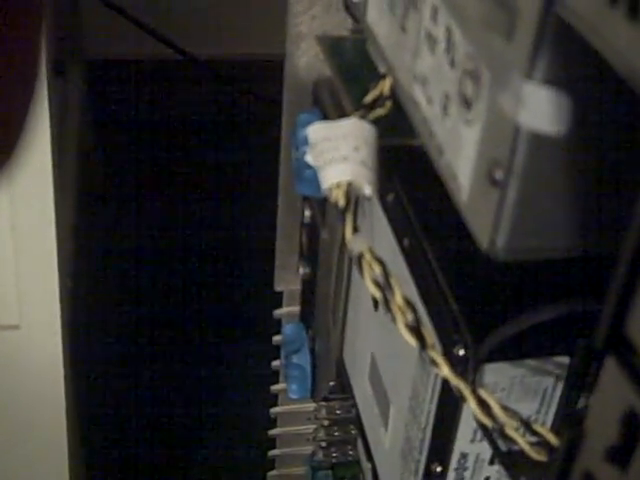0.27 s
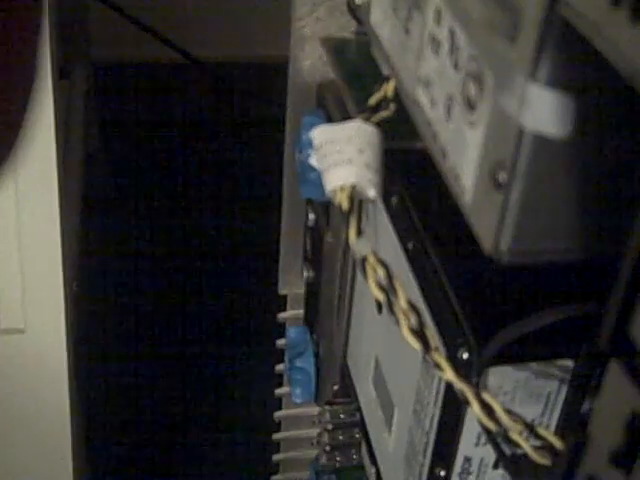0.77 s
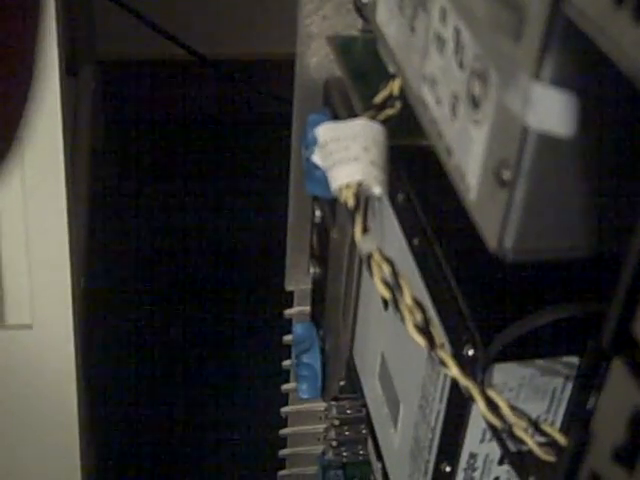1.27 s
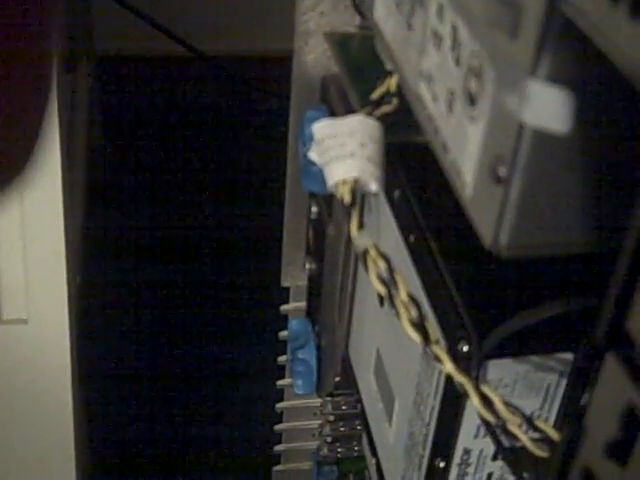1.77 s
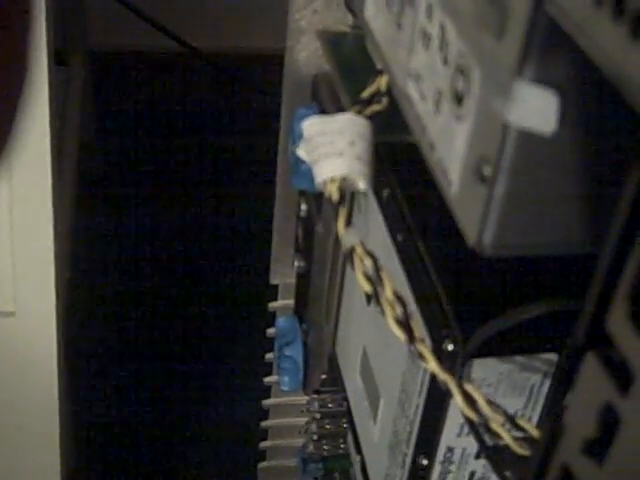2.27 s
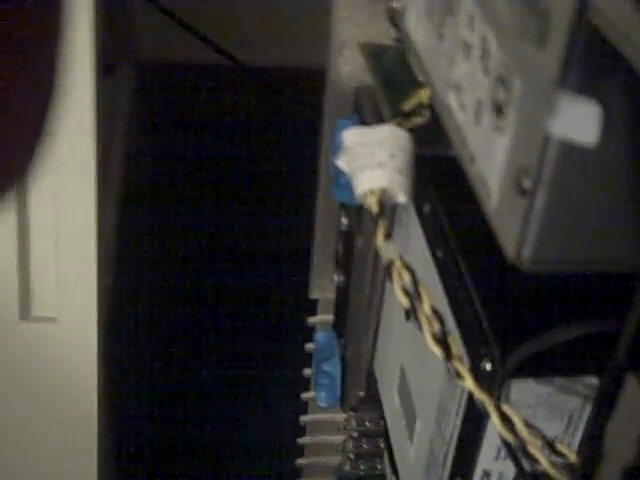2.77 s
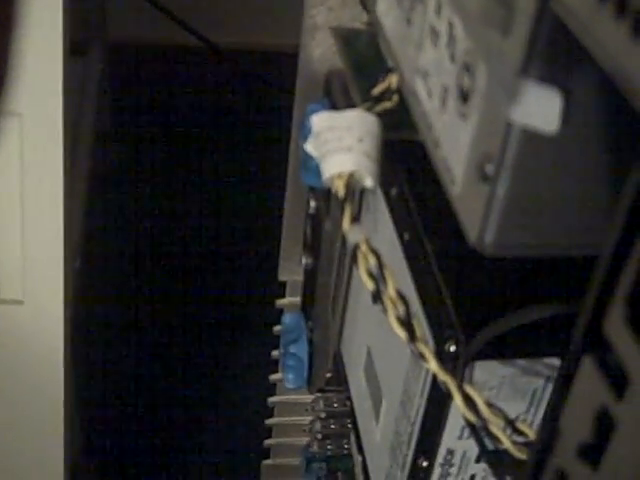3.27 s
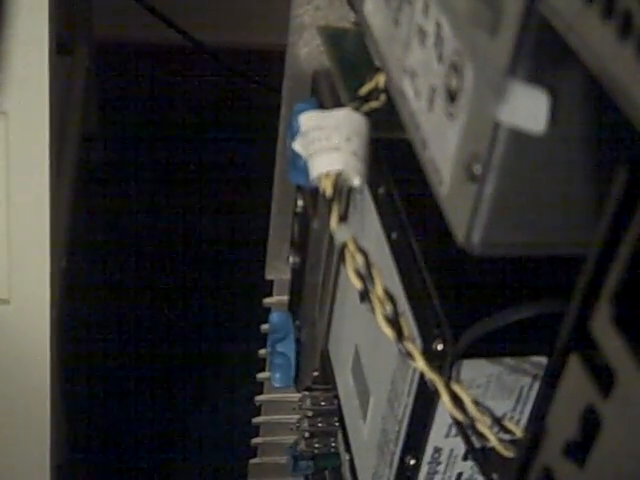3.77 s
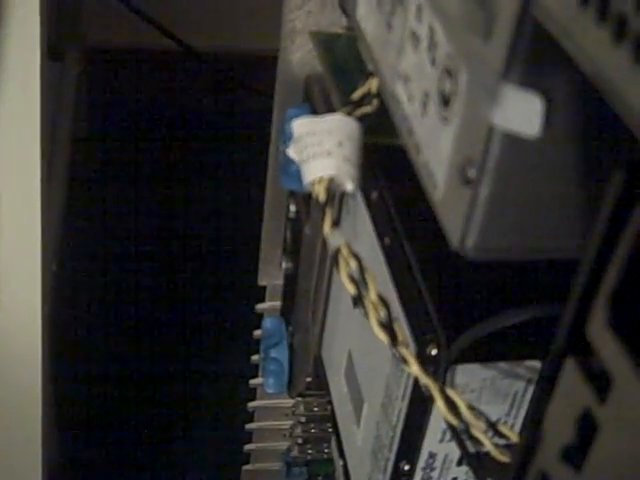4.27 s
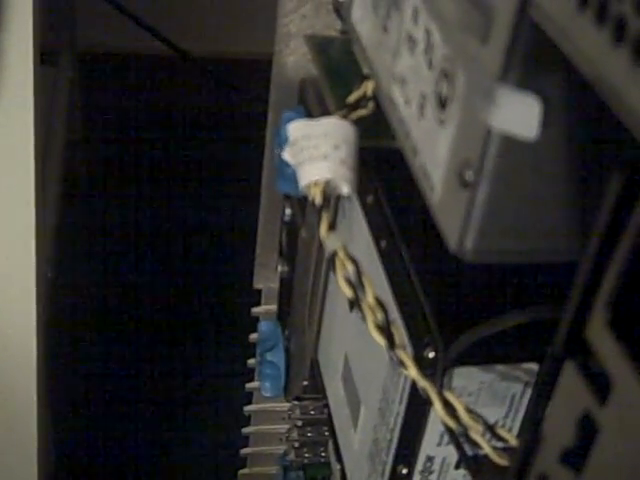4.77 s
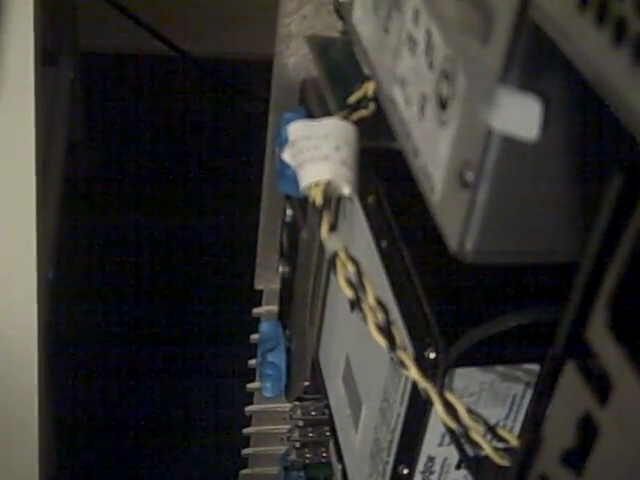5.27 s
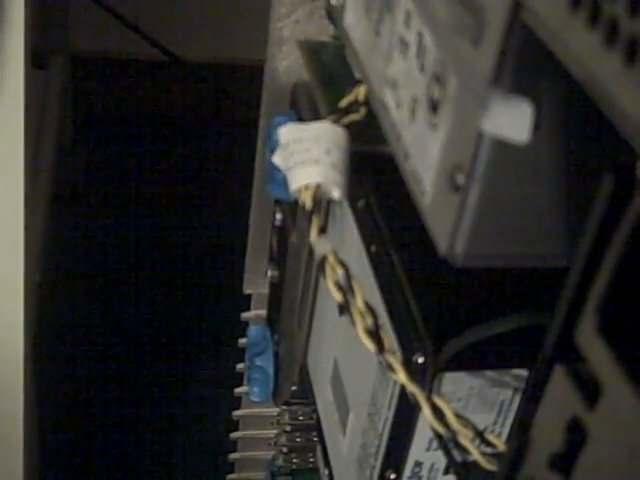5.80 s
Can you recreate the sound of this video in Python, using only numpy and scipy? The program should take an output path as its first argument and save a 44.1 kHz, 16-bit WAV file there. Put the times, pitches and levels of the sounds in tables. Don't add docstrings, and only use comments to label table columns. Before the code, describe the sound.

In a quiet room, a computer clicks on sharply; fans rush up to a steady hum, a drive ticks twice and its whine climbs.

```python
import sys
import numpy as np
from scipy import signal
from scipy.fft import rfft, irfft, next_fast_len
from scipy.io import wavfile
from scipy.ndimage import uniform_filter1d, map_coordinates

SR = 44100
rng = np.random.default_rng(int(sys.argv[2]) if len(sys.argv) > 2 else 0)


def generate_wav(signal):
    frames = np.transpose(np.atleast_2d(signal))
    scaled = np.clip(frames, -1, 1) * 32767
    pcm = np.round(scaled).astype(np.int16)
    wavfile.write(sys.argv[1], SR, pcm)


def elevation(decibels):
    levels = np.asarray(decibels, float)
    return 10 ** (levels / 20)


N = 266275
T = np.arange(N) / SR


def level(x, db):
    return x * elevation(db) / np.sqrt(np.mean(x ** 2))


def colour(x, points, tilt_db=0):
    n = 2 * next_fast_len(len(x) // 2 + 1)
    octave = np.log2(np.maximum(np.arange(n // 2 + 1) * SR / n, 1))
    points = np.array(points)
    db = np.interp(octave, np.log2(points[:, 0]), points[:, 1]) + tilt_db * (octave - 11)
    fold = irfft(np.log(elevation(db)), n) * np.where(np.arange(n) < n // 2, 2, 0)
    fold[0] /= 2
    return irfft(rfft(x, n) * np.exp(rfft(fold)), n)[:len(x)]


def resonate(x, peaks):
    out = np.zeros(len(x))
    for hz, width, db in peaks:
        edges = [hz - width / 2, hz + width / 2]
        band = signal.butter(2, edges, "bandpass", fs=SR, output="sos")
        out += elevation(db) * signal.sosfilt(band, x)
    return out


def ring(x, modes):
    out = np.zeros(len(x))
    for hz, db, t60 in modes:
        pole = np.exp(2j * np.pi * hz / SR - np.log(1000) / (t60 * SR))
        out += elevation(db) * signal.lfilter([1], [1, -pole], x).imag
    return out


def walk(rate):
    k = int(SR / rate)
    steps = np.repeat(rng.standard_normal(N // k + 1), k)
    return 1.12 * uniform_filter1d(uniform_filter1d(steps, k), k)[:N]


def burst(rise, t60, size=22050):
    t = np.arange(size) / SR
    return rng.standard_normal(size) * (1 - np.exp(-(t / rise) ** 2)) * 1000. ** (-t / t60)


def bump(x, centre, half, order=2):
    return np.exp(-((x - centre) / half) ** order)


def add(out, x, s, peak_db):
    start = int(s * SR)
    out[start:start + len(x)] += x * elevation(peak_db) / np.abs(x).max()


def tone(hz, db, flutter_db):
    turns = np.cumsum(hz) / SR + rng.random()
    return np.sqrt(2) * elevation(db + flutter_db * walk(9)) * np.sin(2 * np.pi * turns)


def surroundings():
    # frequency in Hz, level in dB per Hz.
    room_colour = [(12, -31), (20, -7.5), (49, -16.5), (210, -18.5), (399, -20), (459, -11), (558, -22),
                   (678, -11.5), (1030, -20.5), (2020, -16.5), (2530, -24), (14700, -37.5), (16000, -41)]
    # centre in seconds, half length in seconds, level in dB.
    rustles = [(1.88, 0.096, -68.5), (2.97, .1, -76), (4.35, 0.14, -71)]
    # centre in seconds, half length in seconds, top in Hz, arch depth in Hz, level in dB.
    chirps = [(3.13, .15, 9850, 600, -84), (3.1, .15, 8400, 700, -85), (5.58, .08, 13500, 500, -88)]
    room = level(colour(rng.standard_normal(N), room_colour), -66.5) * elevation(0.73 * walk(5.5))
    cloth = level(resonate(rng.standard_normal(N), [(7300, 4300, 0)]), 0)
    cloth = cloth * sum(elevation(db) * bump(T, s, half) for s, half, db in rustles)
    birds = np.zeros(N)
    for s, half, top_hz, arch_hz, db in chirps:
        glide_hz = top_hz - arch_hz * np.minimum(((T - s) / half) ** 2, 2)
        birds += tone(glide_hz, db, flutter_db=5) * bump(T, s, half, order=6)
    return room + cloth + birds


def first_fan(hz, pace):
    # multiple of the turning rate, level in dB at full speed.
    strong_orders = [(7, -63), (8, -66), (10, -71.5)]
    # multiple of the turning rate, level in dB at full speed.
    fan_orders = [(4, -70), (5, -68.5), (6, -68), (9, -78), (11, -74), (12, -75)]
    # centre in Hz, half width in Hz, lift in dB.
    panels = [(620, 44, 0), (753, 30, 6.5), (812, 18.5, 12.5), (870, 14, 17.5), (1030, 36, 13),
              (1160, 28, 7)]
    # centre in seconds, half length in seconds, change in dB.
    hush = [
        (2.9, .22, 4),
        (3.27, .12, -16),
        (3.58, .18, 7),
        (5.3, 1.5, -9),
    ]
    hush_db = sum(db * bump(T, s, half, order=6) for s, half, db in hush)
    strong = np.zeros(N)
    for k, db in strong_orders:
        lift_db = sum(lift * bump(k * hz, centre, half) for centre, half, lift in panels)
        twin_db = hush_db * (k == strong_orders[0][0])
        strong += tone(k * hz, db + lift_db + twin_db, flutter_db=2.3)
    weak = np.zeros(N)
    for k, db in fan_orders:
        weak += tone(k * hz, db, flutter_db=2.5) * np.minimum(k * hz / 470, 1) ** 6
    load = elevation(3 * bump(pace, .85, .13))
    return (strong + weak * load) * pace ** 2


def second_fan():
    # multiple of the turning rate, level in dB at full speed.
    second_orders = [(1, -78.5), (1.787, -82), (2, -67.5), (3, -70), (5, -65.5)]
    top_hz, start_s, rise_s = 150.9, 0.69, .53
    speed = 1 - np.exp(-np.maximum(T - start_s, 0) / rise_s)
    return sum(tone(k * top_hz * speed, db, flutter_db=2.0) for k, db in second_orders) * speed ** 5.3


def case_air(pace):
    # frequency in Hz, level in dB per Hz.
    air_colour = [(59, -67), (100, -40), (193, -26.5), (283, -18), (381, -20), (433, -19.5), (752, -10.5),
                  (818, -5), (1080, -12), (1170, -12), (2800, -12), (3860, -20.5), (9020, -39),
                  (10500, -39), (16000, -53)]
    # frequency in Hz, width in Hz, level in dB.
    cavities = [(596.3, 121, -3.5), (737, 38, -9.5), (900, 62, 1), (985, 36, -0.5), (484, 39, -4.5),
                (1162, 43, -5)]
    # frequency in Hz, width in Hz, level in dB.
    tip_bands = [(10500, 750, 0), (6650, 170, -4), (11900, 1200, -8), (8150, 250, -12)]
    rush = level(colour(rng.standard_normal(N), air_colour), 0)
    rush += level(resonate(rng.standard_normal(N), cavities), -5.0)
    roar = resonate(rush, [(800, 900, 0)])
    rush = roar * pace ** 1.53 + (rush - roar) * pace ** 3.5
    rush_db = -54 + 0.47 * T + 0.39 * walk(12)
    tips = level(resonate(rng.standard_normal(N), tip_bands), 0)
    return rush * elevation(rush_db) + tips * elevation(-72.5) * pace


def fans():
    top_hz, start_s, rise_s = 120.3, .606, .5
    creep_hz, creep_s = 2., 2.
    since = np.maximum(T - start_s, 0)
    hz = top_hz * (1 - np.exp(-since / rise_s)) - creep_hz * np.exp(-since / creep_s)
    hz = np.maximum(hz, 0)
    pace = hz / top_hz
    lines_on = np.clip((T - .95) / 0.23, 0, 1)
    lines = (first_fan(hz, pace) + second_fan()) * lines_on
    buzz = tone(478 + 0 * T, -72, flutter_db=2.5) * bump(T, 1.22, .23, order=6)
    return lines + case_air(pace) + buzz


def platters():
    # frequency in Hz, width in Hz, level in dB.
    drive_body = [(1255, 115, -9), (1433, 76, -5.5), (1723, 180, -6.5), (1967, 64, 2.5), (2073, 116, -1),
                  (2340, 160, -15), (2983, 89, -8.5), (3294, 130, -8.5), (4200, 270, -18),
                  (5260, 160, -27.5), (8120, 130, -31)]
    pole_db = [0, -4, -2]
    start_s, hz_per_s = 3.03, 42
    sag_start_s, sag_hz_per_s2 = 5.18, 4.3
    shaft_hz = hz_per_s * np.maximum(T - start_s, 0) - sag_hz_per_s2 * np.maximum(T - sag_start_s, 0) ** 2
    effort = np.tanh((shaft_hz / 78) ** 1.3)
    turn = np.cumsum(shaft_hz) / SR
    pattern = signal.lfilter([1], [1, -.86], rng.standard_normal((250, 1024)), axis=0)[40:].ravel()
    rough = map_coordinates(pattern, [1024 * turn], order=1) * np.sqrt(shaft_hz / 80)
    pole = (3 * turn).astype(int) % 3
    poles = elevation(np.array(pole_db)[pole]) * np.exp(-(3 * turn % 1) / .35)
    share = np.clip(shaft_hz / 150, 0, 1)
    push = np.sqrt(share) * level(rough * (.6 + poles), 0)
    push += np.sqrt(1 - share) * rng.standard_normal(N)
    whirr = level(resonate(push, drive_body), 0) * elevation(-62 + 11 * effort)
    whirr = whirr * np.clip((T - 1.4) / 1.9, 0, 1)
    kicks = np.maximum(np.diff(poles, prepend=1), 0) * elevation(2.5 * walk(60)) / np.sqrt(share + .04)
    kicks = kicks * np.exp(-shaft_hz / 45.7)
    arm = level(resonate(kicks, [(3770, 200, 0)]), -9)
    arm += level(resonate(push, [(3760, 220, 0), (3300, 120, -5)]), -1)
    arm = arm * elevation(-70 + 12.5 * effort) * np.clip((T - start_s) / .12, 0, 1)
    return whirr + arm


def latch():
    # frequency in Hz, level in dB per Hz.
    latch_colour = [(350, -47), (800, -18), (1300, -0.5), (2200, 3.5), (3800, 4), (5500, -8.5),
                    (7000, -15.5), (12000, -15), (16000, -31)]
    # frequency in Hz, level in dB, t60 in seconds.
    latch_modes = [(1421, -14, .1), (1610, -9, .12), (2180, -3, .05), (3380, -12, .04), (3750, 0, .13),
                   (3860, -6, .13), (5460, -18, .03)]
    # start in seconds, peak in dB, level of the low modes in dB, after-ring in dB.
    ticks = [
        (1.5367, -22, -4.5, -17.5),
        (3.0037, -38.5, -12, -29),
    ]
    out = np.zeros(N)
    t = np.arange(22050) / SR
    for s, peak_db, low_db, after_db in ticks:
        blow = colour(1. * (t == 0), latch_colour)
        modes = [(hz, db + low_db * (hz < 3000), t60) for hz, db, t60 in latch_modes]
        shape = (1 - np.exp(-(t / .0022) ** 2)) * (elevation(after_db) + np.exp(-(t / .0075) ** 4))
        metal = level(ring(blow, modes) * shape, 0)
        scrape = level(colour(burst(0.004, 0.028), latch_colour), -12)
        add(out, metal + scrape, s, peak_db)
    add(out, resonate(burst(.015, .09), [(290, 130, 0)]), 1.77, -57)
    return out


def side_panels():
    # frequency in Hz, level in dB, t60 in seconds.
    long_ring = [(673, -64, 2.5), (829, -63, 3.0), (1130, -66, 2.5), (1287, -64, 1.5), (1550, -58, 1.2),
                 (1610, -63, 1.5), (1814, -59, 1.5), (2616, -60, 1.0), (2735, -64, 2.5), (3190, -58, .7),
                 (6395, -56, .7)]
    snap = 1. * (np.arange(N) == int(.488 * SR))
    return ring(snap, long_ring) * elevation(2.5 * walk(25) - .5)


def switch():
    # frequency in Hz, level in dB per Hz.
    snap_colour = [(240, -43), (400, -14.5), (745, -7), (986, -16.5), (1290, -3.5), (1870, -1.5),
                   (2050, -8.5), (2400, -5), (3700, -16.5), (4460, -10.5), (5820, -18), (6800, -10.5),
                   (12500, -26.5), (15300, -35.5), (16500, -55.5)]
    # frequency in Hz, level in dB, t60 in seconds.
    sheet_modes = [(640, -19.5, 0.24), (1264, -18.5, 0.23), (1360, -10, 0.06), (1650, -17.5, 0.054),
                   (1926, -2.5, 0.12), (2270, -13, 0.21), (2560, -30, 0.18), (2540, -21, 0.029),
                   (3240, -21.5, 0.93), (3980, -26, 0.15), (4050, -55, 0.62), (4400, -36, 0.34),
                   (4530, -28, 0.26), (5280, -28, 0.14), (5884, -31, 0.17), (6960, -35.5, 0.78),
                   (7400, -27, 0.11), (8200, -30.5, 0.12), (8450, -34.5, 0.17), (10420, -33.5, 0.13),
                   (11300, -29, 0.12), (11000, -39.5, 0.13)]
    # start in seconds, peak in dB, t60 in seconds, the part that speaks in Hz, its level in dB.
    touches = [(0.1827, -43.5, 0.025, 2190, 0.5), (.25, -57, 0.081, 1990, 31),
               (0.374, -67.5, 0.036, 4970, 3), (0.4272, -37, 0.04, 4130, -13.5),
               (0.436, -38, 0.095, 2640, -7.5), (0.483, -1.5, 0.064, 1804, -25),
               (0.485, -15.5, 0.0061, 321, 16), (.49, 2.5, 0.025, 1570, -18), (.604, -44, 0.029, 4350, 15),
               (0.864, -48, 0.041, 1900, 2.5), (.603, -49, 0.018, 290, 20)]
    out = side_panels()
    add(out, colour(burst(.03, 1.2, size=44100), snap_colour, tilt_db=-1.5), .49, -45)
    damped = [(hz, db, min(t60, .16)) for hz, db, t60 in sheet_modes]
    for s, peak_db, t60, part_hz, part_db in touches:
        rise = .065 * t60
        push = burst(rise, t60)
        part = resonate(push, [(part_hz, max(part_hz / 4, 170), 0)])
        crack = level(colour(push, snap_colour), 0) + level(part, part_db)
        metal = level(ring(burst(rise / 2, .008), damped), -6)
        tail = level(colour(burst(0.0015, 0.28), snap_colour, tilt_db=-1.5), -9.5)
        add(out, crack + metal + tail, s, peak_db)
    return out


def scene():
    return (surroundings() + fans() + platters() + latch() + switch())[None]


def roll_off(x):
    return signal.sosfilt(signal.butter(12, 16840, fs=SR, output="sos"), x)


def record(dry):
    duck_s, climb_s, step_s, step_db = .487, .8745, .0343, .5
    offset, coupling_s, rest = -.062, .095, -.0004
    lost = np.clip((T - duck_s) / .004, 0, 1) * 12
    lost = lost - np.clip((T - climb_s) // step_s + 1, 0, 12)
    gain = uniform_filter1d(elevation(-step_db * lost), size=60)
    loud = dry * gain
    lean = offset * (gain - 1) + .6 * uniform_filter1d(loud ** 2, size=40)
    bend = signal.lfilter([1, -1], [1, -np.exp(-1 / (coupling_s * SR))], lean)
    loud = np.tanh(loud / 1.3) * 1.3
    return roll_off(loud + bend + rest)


dry = scene()
out = record(dry)
generate_wav(out)
```